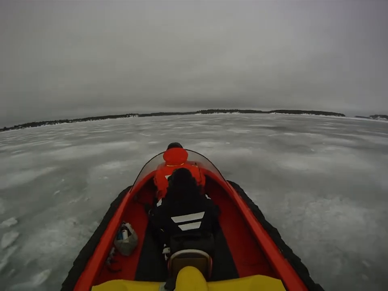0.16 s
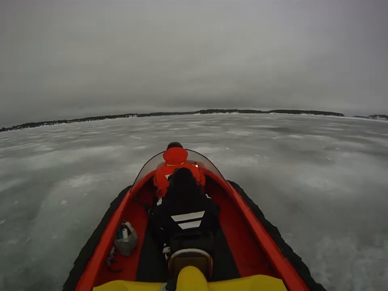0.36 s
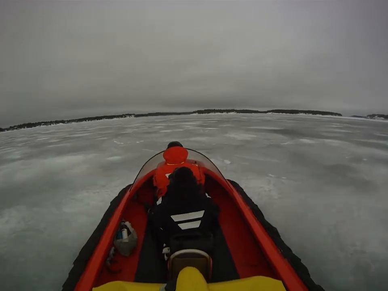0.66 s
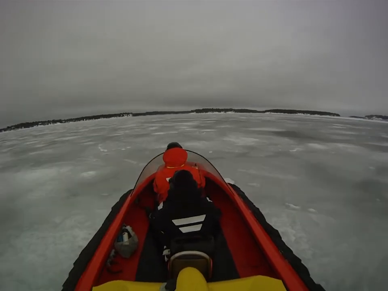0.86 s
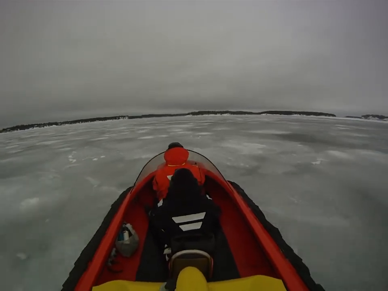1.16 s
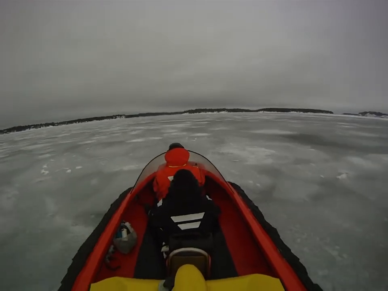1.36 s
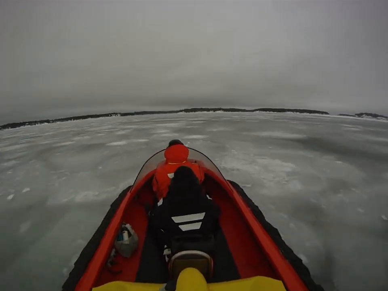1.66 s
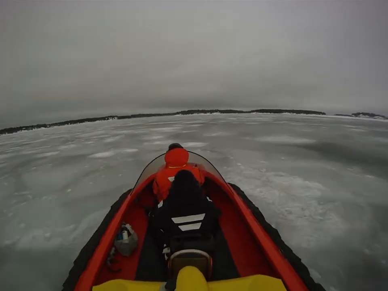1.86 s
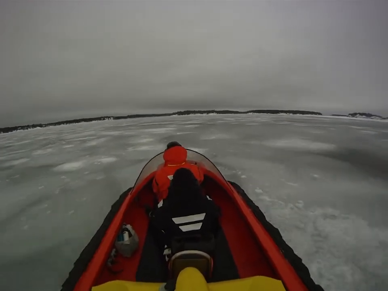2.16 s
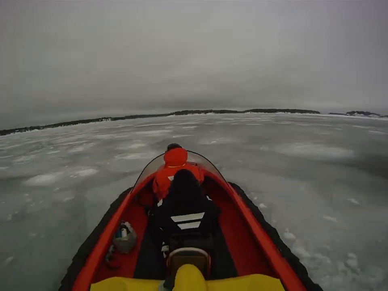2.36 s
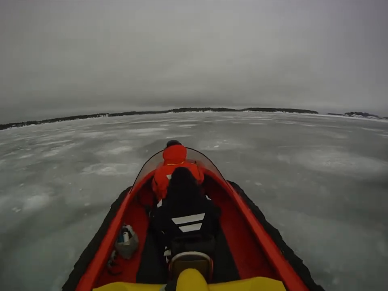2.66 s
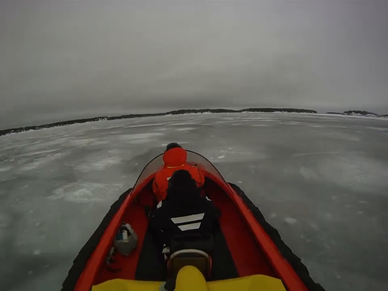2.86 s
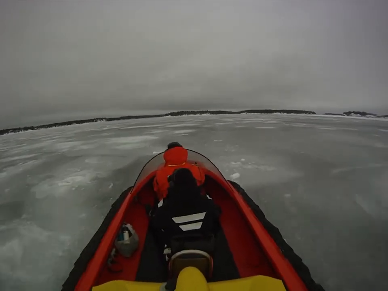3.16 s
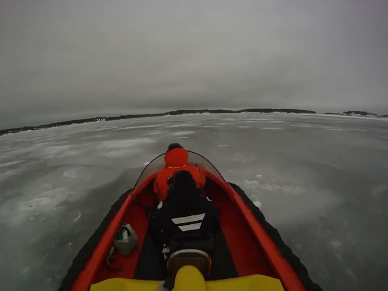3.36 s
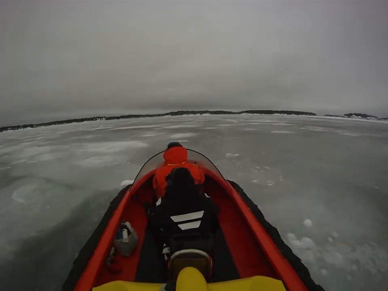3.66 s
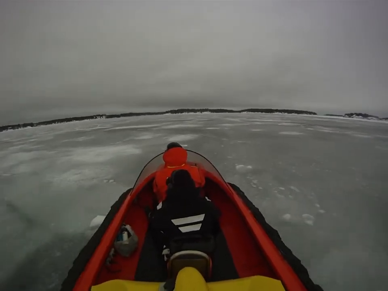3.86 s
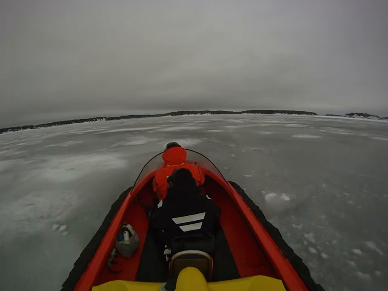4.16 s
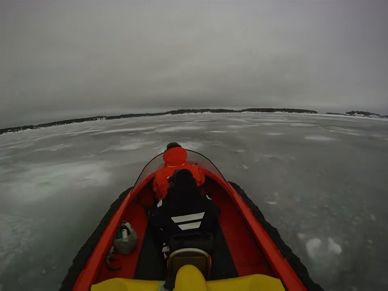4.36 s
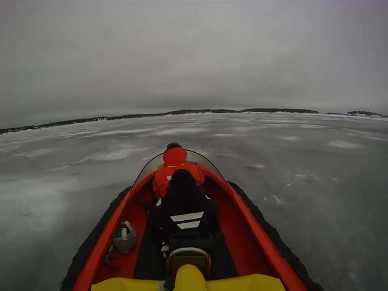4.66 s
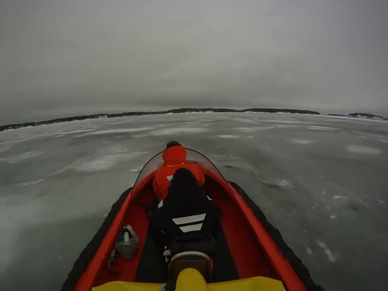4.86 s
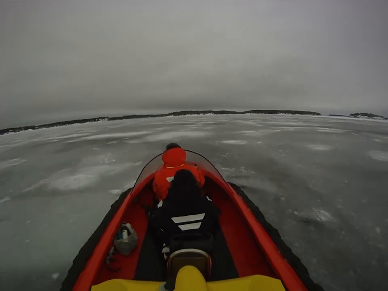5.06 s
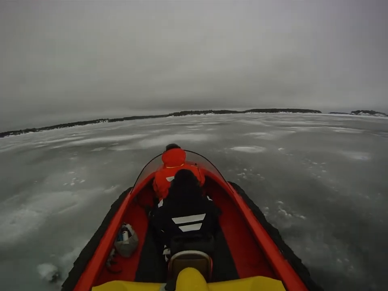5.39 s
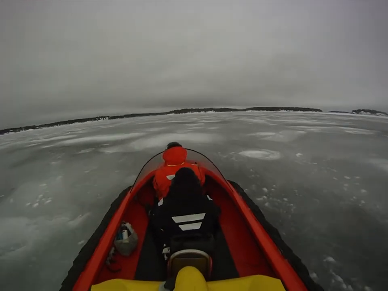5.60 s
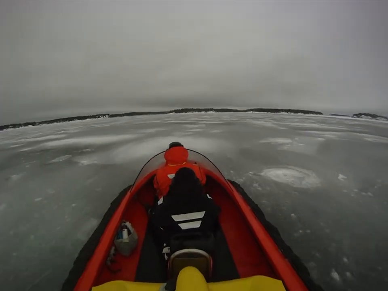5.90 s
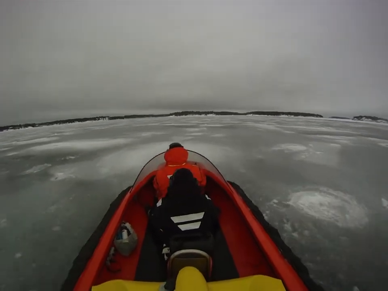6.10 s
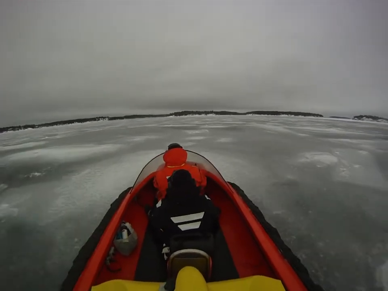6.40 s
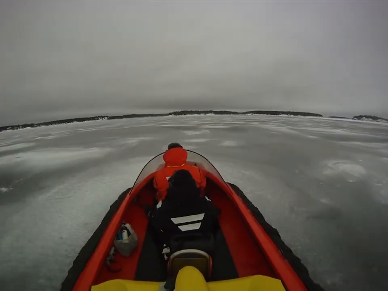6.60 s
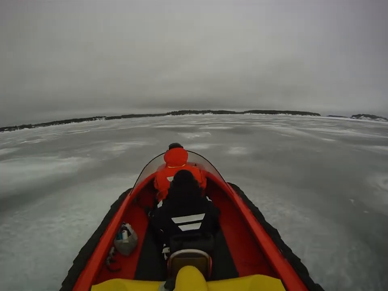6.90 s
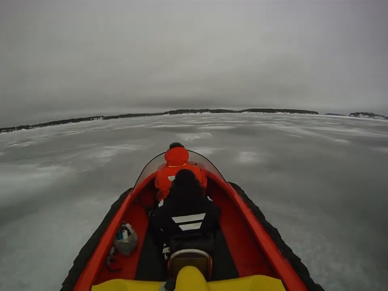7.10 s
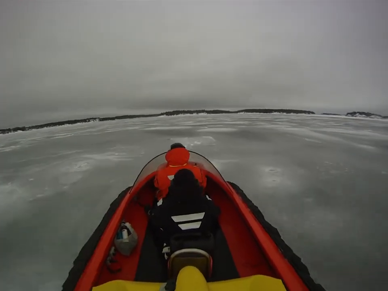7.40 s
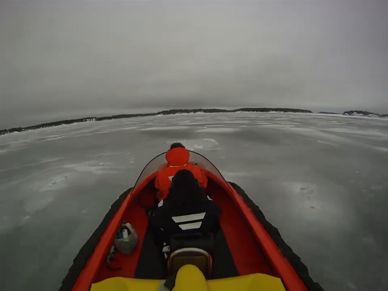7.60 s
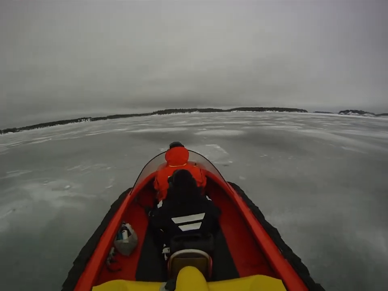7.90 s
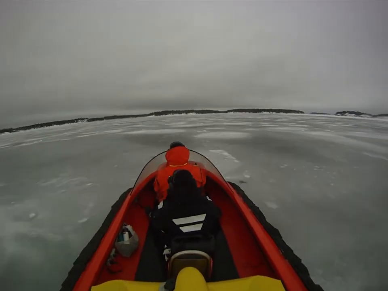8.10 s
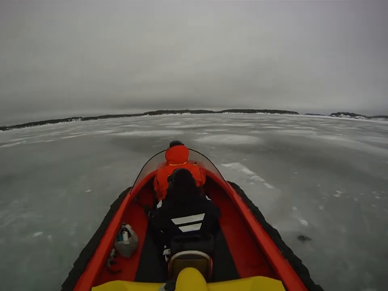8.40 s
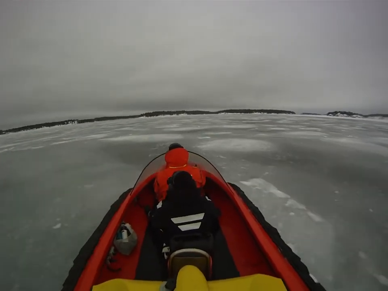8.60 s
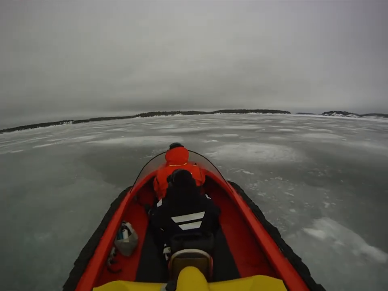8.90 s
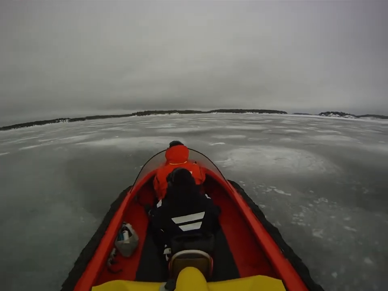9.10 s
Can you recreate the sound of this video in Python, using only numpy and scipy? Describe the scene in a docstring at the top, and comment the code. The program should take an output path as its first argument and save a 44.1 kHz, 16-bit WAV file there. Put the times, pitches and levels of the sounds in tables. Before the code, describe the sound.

A hovercraft crosses sea ice, its engine booming at part throttle over the rush of the fan. About halfway through, the engine sags, is revved once and settles back. The microphone is in a camera fixed to the hull, and its housing shakes against the mount throughout: an even plastic rattle at cruising speed, looser clatter and knocks at other speeds. Slight distortion adds a metallic sizzle.

```python
"""A hovercraft's two-cylinder engine booms at part throttle, sags, is revved once and settles, over the
rush of the fan. The craft crosses sea ice and is heard from a camera fixed to its hull. Every crank turn
shakes the camera housing against its mount: at cruising speed it rocks in step with an even plastic
rattle, at other speeds it clatters and knocks. The recorder limits, holds and clips its samples, which
adds a metallic sizzle."""
import sys
import numpy as np
from scipy import signal
from scipy.fft import rfft, irfft, next_fast_len
from scipy.io import wavfile
from scipy.ndimage import uniform_filter1d, map_coordinates

SR = 44100
rng = np.random.default_rng(int(sys.argv[2]) if len(sys.argv) > 2 else 0)


def generate_wav(signal):
    """Clip the signal to [-1, 1] and save it as 16-bit WAV at the path in sys.argv[1]."""
    frames = np.transpose(np.atleast_2d(signal))
    scaled = np.clip(frames, -1, 1) * 32767
    pcm = np.round(scaled).astype(np.int16)
    wavfile.write(sys.argv[1], SR, pcm)


N = 407925

# Engine speed. Each row: time in seconds, firings per second (two firings make one crank turn).
ENGINE_SPEED = [(0.0, 47.4), (0.9, 43.31), (1.03, 42.1), (2.62, 41.87), (3.56, 41.59), (4.3, 42.64),
                (4.99, 37.32), (5.05, 38.93), (5.25, 52.7), (5.54, 60.87), (5.77, 60.49), (6.64, 48.28),
                (7.04, 45.3), (7.6, 43.34), (8.26, 43.6), (8.93, 40.33), (9.25, 42.28)]
# How well the hull passes each pitch. Each row: frequency in Hz, gain in dB.
HULL_RESPONSE = [(20, -7), (42, -15), (63, -2), (84, -1.5), (105, 0.5), (135, 4.5), (165, -5), (210, 0.5),
                 (238, -1), (268, 3), (310, -9), (335, -16), (365, -10.5), (420, -27), (480, -20.5),
                 (600, -34)]
# What a tap and a knock feed into the housing. Each row: frequency in Hz, gain in dB.
TAP_TONE = [(700, 4.5), (1300, -1.5), (1850, 2.5), (2180, 4.5), (2800, -2.5), (3550, -8.5), (5200, -8)]
KNOCK_TONE = [(700, -6), (1300, -2), (1700, -2), (2200, 4), (2800, 2), (3550, -2), (4300, -0.5), (5400, -4)]
# The tick, tap and buzz of every turn. Each row: place in the turn from 0 to 1, base level in dB, change
# when rocking in dB, scrape time in seconds, level scatter in dB, timing scatter in seconds.
CONTACTS = [(.165, -19, -8, 0.0016, 1.7, .0012), (.435, -20, 3.5, 0.00097, 1.3, 0.00066),
            (.69, -22, 7, 0.0018, 2.5, .0007)]

ROCK_HZ, ROCK_WIDTH_HZ = 41.6, 1.6  # near this firing rate the housing rocks in step with the crank
OVERSPEED_HZ, LIGHTEN_DB = 46, -9  # above this rate it loses step; contacts lighten per unit of excess
BRIGHT_UNTIL_S = .915  # until then the rattle and sizzle are slightly higher and fizzier


def amp(db):
    """Turn decibels into a gain."""
    return 10 ** (np.asarray(db) / 20)


def unit(x):
    """Scale to an average (rms) level of 1."""
    return x / np.sqrt(np.mean(x ** 2) + 1e-20)


def along(points, hz):
    """Read between rows of frequency and value, on a log frequency axis."""
    freqs, values = np.transpose(points)
    return np.interp(np.log(hz + 1), np.log(freqs + 1), values)


def wobble(rate):
    """A smooth random curve through `rate` points a second."""
    points = rng.standard_normal(int(N * rate / SR) + 4)
    return unit(map_coordinates(points, [np.arange(N) * rate / SR], order=2))


def filtered(x, response):
    """Filter x; `response` gives the gain at each frequency."""
    size = next_fast_len(N + SR // 2)
    return irfft(rfft(x, size) * response(np.fft.rfftfreq(size, 1 / SR)), size)[:N]


def place(times, sounds):
    """Add short sounds, one per row, to a track at their start times."""
    index = np.round(np.clip(times, 0, None) * SR).astype(int)[:, None] + np.arange(sounds.shape[1])
    return np.bincount(index.ravel(), sounds.ravel(), N)[:N]


def firing_rate(times):
    """Firings per second at the given times."""
    return np.interp(times, *np.transpose(ENGINE_SPEED))


def rocking(times):
    """How well the housing rocks in step with the crank, from 0 to 1."""
    return np.exp(-((firing_rate(times) - ROCK_HZ) / ROCK_WIDTH_HZ) ** 2)


def ahead(times):
    """How far the engine has risen past the rocking speed, from 0 to 1."""
    return (1 - rocking(times)) * (firing_rate(times) > ROCK_HZ)


def overspeed(times):
    """The share by which the engine runs faster than the housing can follow."""
    return np.maximum(firing_rate(times) / OVERSPEED_HZ - 1, 0)


def throttle_db(firing_hz):
    """Extra level while the engine gains speed."""
    rise_hz_per_s = np.maximum(np.gradient(firing_hz) * SR, 0)
    return 0.04 * uniform_filter1d(rise_hz_per_s, size=4000)


def pitch_lift(times):
    """A pitch factor that makes the rattle and sizzle slightly higher at the start."""
    return np.where(times < BRIGHT_UNTIL_S, 1.031, 1)


def each_turn(t, turns, angle, lag_turns_per_hz=.017):
    """When the housing reaches a given fraction of each turn; it trails the crank more at speed."""
    trailing = turns - lag_turns_per_hz * (firing_rate(t) - ROCK_HZ)
    return np.interp(np.arange(int(turns[-1])) + angle, trailing, t)


def fan(firing_hz):
    """Swirling air rushes louder as the engine runs faster."""
    # Air in the fan duct and under the skirt. Each row: frequency in Hz, gain in dB.
    air_tone = [(15, -31), (30, -12), (70, -1), (105, -5), (140, -2), (175, -0.5), (270, -2.5),
                (320, -10.5), (370, -13.5), (440, -24), (540, -30), (800, -25.5), (2000, -43.5)]
    rush_db = -25.5 + throttle_db(firing_hz) + 3 * np.log2(firing_hz / ROCK_HZ)
    rush = unit(filtered(rng.standard_normal(N), lambda hz: amp(along(air_tone, hz))))
    return amp(rush_db) * rush


def whine(turns, firing_hz, cycles_per_firing=8):
    """A faint engine whine at eight times the firing rate swells where the hull resonates."""
    whine_db = along(HULL_RESPONSE, cycles_per_firing * firing_hz) - 30.5
    whine_phase = 2 * np.pi * cycles_per_firing * 2 * turns
    return amp(whine_db) * unit(amp(2.9 * wobble(5)) * np.sin(whine_phase + 0.5 * wobble(14)))


def housing(hz, tone):
    """How strongly the housing rings at each frequency, fed by one kind of contact."""
    # The housing's ringing pitches. Each row: frequency in Hz, width in Hz, gain in dB.
    resonances = [(715.4, 44.3, -14), (805, 14.5, -15), (972, 27, -11), (1272, 143, -6), (1365, 30, -9),
                  (1637, 85, -0.5), (1916, 126, 0), (2137, 123, 3.5), (2268, 143, -1.5), (2782, 83, -12.5),
                  (3068, 116, -13), (3600, 136, -5), (3947, 305, -14.5), (5020, 710, -30)]
    power = sum(amp(db) ** 2 / (1 + ((hz - centre) / width) ** 2) ** 2
                for centre, width, db in resonances)
    return np.sqrt(power) * amp(along(tone, hz))


def strikes(times, db, tone, scrape_s, size=2048):
    """Short scrapes ring the housing; db is the level of each if its energy were spread over 5 ms."""
    age, hz = np.arange(size) / SR, np.fft.rfftfreq(size, 1 / SR)
    pitches, which = np.unique(pitch_lift(times), return_inverse=True)
    # These two steps make a filter that rings only after the touch, never before it.
    cepstrum = irfft(np.log(housing(hz / pitches[:, None], tone) + 1e-6))
    ring = np.exp(rfft(2 * cepstrum[:, :size // 2], size))
    force = rng.standard_normal((len(times), size)) * age * np.exp(-age / scrape_s)
    hits = irfft(rfft(force) * ring[which])
    hits *= (amp(db) / np.sqrt(np.sum(hits ** 2, axis=1) / (.005 * SR)))[:, None]
    return place(times, hits)


def pings(t, turns, angle, centre_hz=3553, spread=.012, ring_s=0.0038, size=900):
    """After a contact the housing sings briefly, at a pitch set by how it sits on the mount."""
    times = each_turn(t, turns, angle)
    late, strength, detune = rng.standard_normal((len(times), 3)).T
    over = overspeed(times)
    times = np.clip(times + late * (0.0015 + 0.036 * over), 0, None)
    hz = centre_hz * pitch_lift(times) * (1 + spread * detune + 0.04 * over)
    age = np.arange(size) / SR
    roughness = 0.055 * np.cumsum(rng.standard_normal((len(times), size)), axis=1)
    envelope = amp(4.8 * strength)[:, None] * age * np.exp(-(age / ring_s) ** 2)
    return unit(place(times, envelope * np.sin(2 * np.pi * hz[:, None] * age + roughness)))


def singing(t, turns):
    """A high ping follows every buzz, and the ticks too when the housing is out of step."""
    after_buzz = pings(t, turns, angle=CONTACTS[2][0])
    after_tick = pings(t, turns, angle=CONTACTS[0][0])
    return amp(-38.5) * after_buzz + amp(-40.5) * (1 - rocking(t)) * after_tick


def jolts(t, turns, chance=.5):
    """Above the rocking speed, a tick now and then lands as a small knock."""
    times = each_turn(t, turns, angle=CONTACTS[0][0])
    lands = rng.uniform(size=len(times)) < chance * ahead(times)
    db = -16 + LIGHTEN_DB * overspeed(times) + 0.4 * rng.standard_normal(len(times))
    return strikes(times, np.where(lands, db, -np.inf), KNOCK_TONE, scrape_s=0.00034)


def knocks(crack_db, thud_db):
    """Jolts throw the housing about: dull thuds at low revs, hard cracks on its stop at higher ones."""
    # The hardest knocks on the mount. Each row: start in seconds, relative level in dB.
    hard_knocks = [(0.1245, 3), (0.2102, -2.5), (0.2972, -2.5), (0.3941, -6), (0.4388, -6), (0.473, 2),
                   (0.6604, -4.5), (1.4691, -7), (1.944, -2.5), (2.0882, -1.5), (2.3286, -1.5),
                   (3.668, -5.5), (4.5846, -3), (4.6723, 0.5), (4.785, 2), (5.3065, -3), (5.37, 3.5),
                   (5.4745, 0.5), (5.67, 1), (6.2412, 1), (6.4178, -3), (6.4443, -0.5), (6.5236, 1.5),
                   (6.6859, -2), (6.8094, 2), (6.8443, 1), (6.897, 0), (6.9307, 5), (7.0182, 0),
                   (7.0693, -1), (7.114, -2.5), (7.1766, -3), (7.2933, -3.5), (7.3292, -2), (7.3825, -3.5),
                   (7.7027, -2), (7.8408, 0), (8.454, 0), (8.9472, 1.5)]
    times, db = np.transpose(hard_knocks)
    fast = firing_rate(times) > 43
    cracks = strikes(times[fast], db[fast] + crack_db, KNOCK_TONE, scrape_s=0.00064)
    thuds = strikes(times[~fast], db[~fast] + thud_db, TAP_TONE, scrape_s=0.00039)
    return cracks + thuds


def shaken(t, turns, tone, angle, level_db, rocking_db, scrape_s, scatter_db, jitter_s):
    """The housing meets its mount once a turn; at high revs the touch is lighter and less regular."""
    times = each_turn(t, turns, angle)
    late, strength = rng.standard_normal((len(times), 2)).T
    over = overspeed(times)
    db = level_db + rocking_db * rocking(times) + LIGHTEN_DB * over + scatter_db * strength
    return strikes(times + late * (jitter_s + .025 * over), db, tone, scrape_s)


def rattle(t, turns, chatter_db=-25, settle_db=-2.5, fizz_db=-28.5):
    """The housing ticks, taps and buzzes on every turn, and chatters loosely over a steady fizz."""
    # What each kind of contact feeds into the housing. Each row: frequency in Hz, gain in dB.
    tick_tone = [(700, -5), (1300, 5), (2100, 6.5), (2800, 9), (3550, 0.5), (5200, 9.5)]
    buzz_tone = [(700, -3.5), (1300, -13), (1900, 3), (2200, -3), (2800, -9.5), (3550, -2.5), (4400, -15),
                 (5200, -21.5)]
    chatter_tone = [(700, 5), (1300, 5), (1650, 4), (2100, -0.5), (2800, 1), (3550, -5.5), (4300, -8),
                    (5200, 3)]
    tones = (tick_tone, TAP_TONE, buzz_tone)
    beat = sum(shaken(t, turns, tone, *row) for tone, row in zip(tones, CONTACTS))
    touches = np.sort(rng.uniform(0, t[-1], size=1200))
    db = chatter_db + settle_db * rocking(touches) + 1.3 * rng.standard_normal(len(touches))
    chatter = strikes(touches, db, chatter_tone, scrape_s=0.00043)
    grit = rng.standard_normal(N)
    bright, plain = [filtered(grit, lambda hz: housing(hz / pitch, chatter_tone))
                     for pitch in pitch_lift(t[[0, -1]])]
    fizz = unit(np.where(t < BRIGHT_UNTIL_S, bright, plain))
    return beat + chatter + amp(fizz_db) * fizz


def exhaust(t, turns, firing_hz, roughness, even_out_db, thin_db, race_db):
    """Exhaust pulses thump through the hull; uneven burning makes them flutter, more at high revs."""
    overtones, over, fast = np.zeros(N), overspeed(t), ahead(t)
    # Odd overtones come from unequal cylinders, which even out away from the rocking speed.
    unequal_db = -9 * over + even_out_db * (1 - rocking(t))
    flutter = roughness * (1 + 3 * over)
    for k in range(1, 21):  # k cycles per crank turn
        hull_db = along(HULL_RESPONSE, k * firing_hz / 2)
        load_db = over * (race_db - 10 * np.log2(max(k, 5) / 7))  # racing leaves mostly the low tones
        upper_db = thin_db * (k > 11) * fast
        gain = amp(hull_db + unequal_db * (k % 2 - .5) + load_db + upper_db)
        cycles = k * (turns - .475) + .25 + .09 * rng.standard_normal()
        if k != 2:  # the boom already plays the firing rate
            swell = 1 + flutter * wobble(9)
            overtones += gain * swell * np.cos(2 * np.pi * cycles + flutter * wobble(9))
    return unit(overtones)


def engine(t, turns, firing_hz):
    """Two firings per crank turn make a deep boom, with the exhaust's overtones around it."""
    # The boom's strength at each speed. Each row: firings per second, level in dB.
    boom_levels = [(37, -19.5), (42, -18.5), (45.5, -22), (50, -19.5), (60, -17)]
    boom = amp(along(boom_levels, firing_hz)) * unit(np.sin(2 * np.pi * 2 * turns))
    overtones = exhaust(t, turns, firing_hz, roughness=.27, even_out_db=-5.0, thin_db=-3.5, race_db=-10)
    return boom + amp(-21 + throttle_db(firing_hz)) * overtones


def scene():
    """The turning crank drives the housing's rattle, the engine's boom and whine, and the fan."""
    t = np.arange(N) / SR
    firing_hz = firing_rate(t)
    turns = np.cumsum(firing_hz) / SR / 2
    mount = rattle(t, turns) + singing(t, turns) + jolts(t, turns) + knocks(crack_db=-9.5, thud_db=-10.5)
    return (engine(t, turns, firing_hz) + fan(firing_hz) + whine(turns, firing_hz) + mount)[None]


def limiter(x, threshold_db, release_db_per_s, attack_s):
    """Peaks over the threshold pull the gain down a moment later; it then creeps back."""
    fall = release_db_per_s * np.arange(N) / SR
    over_db = np.maximum(20 * np.log10(np.abs(x) + 1e-9) - threshold_db, 0)
    held_db = np.maximum.accumulate(over_db + fall) - fall
    keep = np.exp(-1 / (attack_s * SR))
    return x * amp(-signal.lfilter([1 - keep], [1, -keep], held_db))


def sample_and_hold(x, hold_hz, jitter, wander):
    """Holding each sample mirrors the sound around the hold rate; the clock starts fast and shaky."""
    t = np.arange(N) / SR
    unsteady = (t < BRIGHT_UNTIL_S) * (jitter * rng.standard_normal(N) + wander * wobble(1500))
    clock = np.cumsum(hold_hz * pitch_lift(t)) / SR + unsteady
    band = filtered(x, lambda hz: 1 / np.sqrt(1 + (hz / 5650) ** 50))
    # A held wave changes only when the clock ticks: its slope is sampled, then summed up again.
    slope = np.diff(band, prepend=0)
    ticks = slope * 2 * np.cos(2 * np.pi * clock)
    sizzle = filtered(ticks, lambda hz: 1 / (2j * np.pi * np.maximum(hz, hold_hz / 2) / SR))
    return band + sizzle


def record(dry):
    """The recorder limits peaks, samples coarsely, clips at full scale and cuts the highest treble."""
    limited = limiter(dry[0], threshold_db=-3, release_db_per_s=114, attack_s=0.014)
    held = sample_and_hold(limited, hold_hz=12000, jitter=0.032, wander=0.12)
    clipped = np.clip(held, -1, 1)
    return filtered(clipped, lambda hz: 1 / np.sqrt(1 + (hz / 15250) ** 200) * (hz < 16100))[None]


dry = scene()
out = record(dry)
generate_wav(out)
```